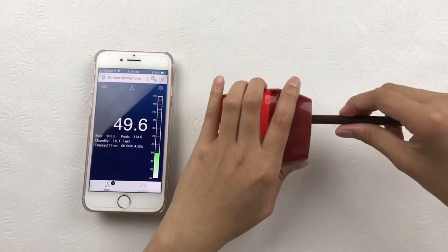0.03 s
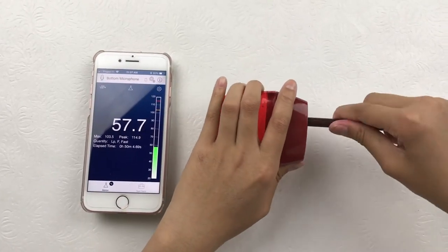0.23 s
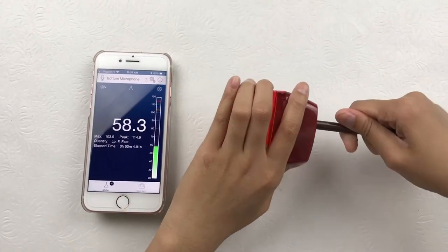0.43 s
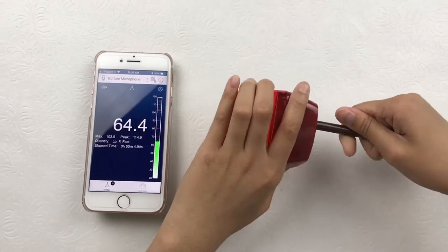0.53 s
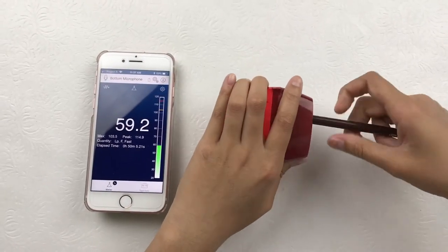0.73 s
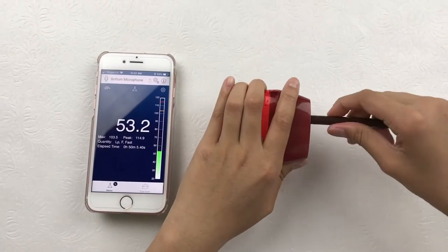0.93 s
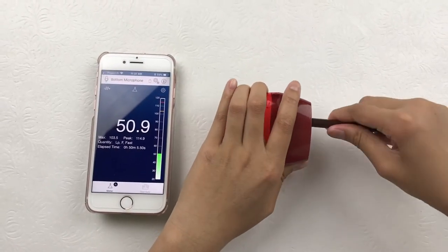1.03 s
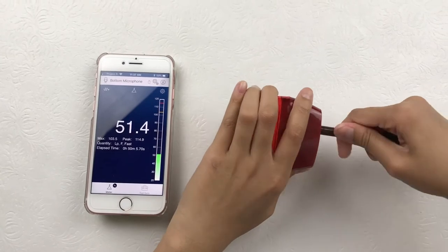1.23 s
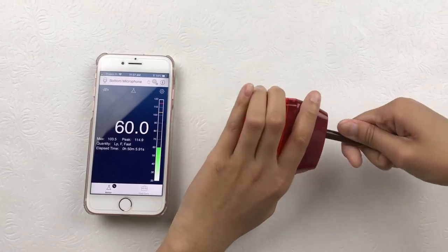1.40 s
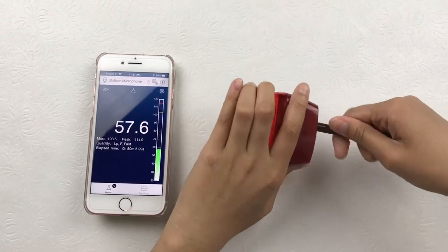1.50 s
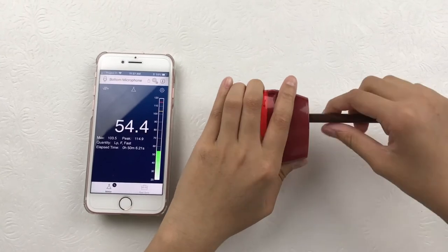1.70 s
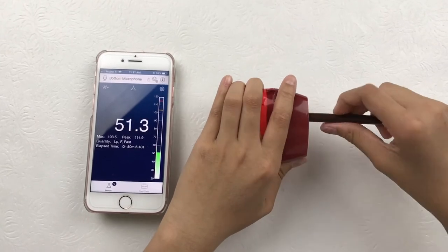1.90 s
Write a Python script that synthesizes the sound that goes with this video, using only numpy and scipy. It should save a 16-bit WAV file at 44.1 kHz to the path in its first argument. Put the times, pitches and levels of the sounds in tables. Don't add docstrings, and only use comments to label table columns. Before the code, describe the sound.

Close, dry pencil sharpening on a table: irregular stick-slip rasps peak in a hard double crack, pause for light finger rustles, resume more gently, then fade to small ticks over faint room hum.

```python
import sys
import numpy as np
from scipy import signal
from scipy.fft import rfft, irfft
from scipy.io import wavfile
from scipy.ndimage import uniform_filter1d

SR = 44100
rng = np.random.default_rng(int(sys.argv[2]) if len(sys.argv) > 2 else 0)


def attenuation_scalar(level_db):
    decades = np.asarray(level_db, float) / 20
    return 10 ** decades


def to_wav(sig):
    pcm = np.clip(np.atleast_2d(sig), -1, 1) * 32767
    pcm = np.round(pcm).astype(np.int16)
    wavfile.write(sys.argv[1], SR, pcm.T)


N = 85995

# [width/Hz, level/dB]
CUP_HZ = [1845, 2040, 1450, 1100]
CUP_MODES = [(105, 3), (170, -8), (250, -13), (400, -33.5)]
# [width/Hz, level/dB]
HOUSING_HZ = [2925, 3320, 3750, 4230, 4710, 5170, 5650, 6490]
HOUSING_MODES = [(108, -3), (156, 0), (237, -5), (193, -8.5), (150, -3.5), (238, 1), (278, -4), (216, -24)]
# [width/Hz, level/dB]
FIBRE_HZ = [7700, 8600, 9670, 12160, 14360]
FIBRE_MODES = [(970, -9.5), (1050, -21), (2630, -16), (1120, -9.5), (1500, -12)]
# [t/s, level/dB]
MUTING = [
    (.6, 2),
    (1.1, -3.5),
    (1.33, -5.5),
    (1.4, 1),
]


def sharpener(t):
    table_t60_s, table_db = 0.19, -13
    hollow_hz, hollow_width_hz = 2575, 360
    env, cracks = slips(t)
    noise = np.array([tearing() for _ in env])
    cup, housing, fibres = (env + scrape(t)) * noise + cracks
    mute_db = np.interp(t, *np.array(MUTING).T)
    direct = attenuation_scalar(15.0) * body(cup, CUP_HZ, CUP_MODES)
    direct += attenuation_scalar(6.0) * body(housing, HOUSING_HZ, HOUSING_MODES, mute_db)
    direct += attenuation_scalar(5.0) * body(fibres, FIBRE_HZ, FIBRE_MODES)
    direct = direct - 0.66 * ring(direct, hollow_hz, hollow_width_hz)
    direct = direct + knocks(t) + rings(t)
    tail_s = np.arange(SR // 4) / SR
    tail = rng.standard_normal(SR // 4) * attenuation_scalar(-60 * tail_s / table_t60_s)
    tail = tail / np.sqrt(np.sum(tail ** 2))
    return direct + attenuation_scalar(table_db) * signal.fftconvolve(direct, tail)[:N]


# [t/s, peak level/dB, cup ring level/dB, fibre crackle level/dB, fade/ms]
SNAPS = [(0.2045, -19.5, -19, -18, 2.65), (0.2603, -26.5, -11, -9, 3.4), (0.4446, -15.5, -9, -3, 1.25),
         (0.4806, -2.5, -19, -11, 2.8), (0.4892, -4.5, -15.5, -9.5, 2.13), (0.5065, -17.5, -8.5, -16, 3.6),
         (0.5219, -21, -4.5, -10, 2.4), (0.5593, -12, -10.5, -11, 2.65), (1.068, -39, -8, -16, 4.6),
         (1.2796, -28.5, -19, -7, 3.5), (1.3369, -29.5, -6.5, -14, 5.2), (1.3734, -31, -26, -6, 2),
         (1.3922, -36, -25, -15, 2.5), (1.4142, -19.5, -12, -17, 2.2), (1.4856, -39, -29, -12, 7.2),
         (1.5963, -58.5, 7, -18, 2.8)]
MORE_SNAP_S = [
    .2000,
    .5625,
    1.4285,
    1.346,
    .378,
    1.620,
    .5445,
    1.4350,
]
# [peak level/dB, cup ring level/dB, fibre crackle level/dB, fade/ms]
MORE_SNAP_SIZES = [(-32.5, -20, -9, 4.1), (-12, -37, -24, 2.7), (-22, -21, -11.5, 4.4), (-28, -17, -17, 5.3),
                   (-33, -6, -11, 2), (-57, -19, -18, 9.7), (-41, -3, -1, 3.5), (-13, -26, -13, 2.4)]
# [t/s, peak level/dB, cup ring level/dB, fibre crackle level/dB, swell/ms]
RASPS = [(0.2142, -26, -39, -17, 3.4), (0.2566, -25, -6.5, -12.5, 3), (0.309, -34, -16, -12, 1.6),
         (0.3384, -28.5, -26, -15, 5.1), (0.3842, -29, -3.5, -7, 2.5), (0.402, -43.5, 7.5, -18, 3.8),
         (0.411, -40, -6, -3, 1.5), (0.425, -28.5, -4.5, -5, 2.8), (0.5744, -29.5, -0.5, -20, 1.6),
         (0.592, -25.5, -9, -13, 2.9), (1.1252, -38, -17, -22, 3.5), (1.1383, -36.5, -10.5, -17, 4.9),
         (1.158, -34, -14.5, -13, 5.2), (1.179, -32, -10, -19, 1.5), (1.196, -33, -32, -14, 1.44),
         (1.2257, -20, -19.5, -14.5, 1.6), (1.254, -30, -24, -12, 5.4), (1.291, -27.5, -37, -13, 5),
         (1.303, -30.5, -26, -17, 6.6), (1.3187, -35, -26, -17.5, 3.9), (1.3565, -23.5, -17, -11, 1.7),
         (1.4235, -23.5, -28, -15, 3), (1.439, -21, -19, -23, 2.2)]
# [t/s, peak level/dB, cup ring level/dB, fibre crackle level/dB, swell/ms]
REGRIPS = [(0.685, -50, 0.5, -27, 1.7), (0.758, -39.5, -7, -25, 6.8), (0.775, -35, -10, -29, 2.6),
           (0.795, -47, -30, -23, 1.9), (0.945, -48, -17, -19, 1.9), (1.0293, -44.5, -12.5, -18, 4.3),
           (1.1, -48, -12, -11, 1.7), (1.643, -43.5, -8, -23, 3.8), (1.6861, -43, -22, -21, 5.3),
           (1.699, -33, -16, -30, 5.6), (1.7262, -32.5, -29, -35, 3.5), (1.7494, -44.5, -2, -26, 3.2),
           (1.7697, -38, -8, -29, 1.9), (1.7844, -45, -10, -13, 6.9), (1.8045, -35.5, -17, -44, 4.8),
           (1.826, -56, 5, -20, 4.3)]


def slips(t):
    slip_db, rise_ms, snap_db = -8, 0.62, 2
    rasp_db, cup_gain_db, crackle_gain_db = -6, 6.5, 13
    env, cracks = np.zeros((3, N)), np.zeros((3, N))
    snaps = SNAPS + [(at, *row) for at, row in zip(MORE_SNAP_S, MORE_SNAP_SIZES)]
    for k, (at, db, cup_db, crackle_db, span_ms) in enumerate(snaps + RASPS + REGRIPS):
        ms = np.clip((t - at) * 1000, 0, None)
        span_ms = max(span_ms, .3)
        share = attenuation_scalar(db) * np.array([[attenuation_scalar(cup_db + cup_gain_db)], [1], [attenuation_scalar(crackle_db + crackle_gain_db)]])
        if k < len(snaps):
            env += share * attenuation_scalar(slip_db) * (1 - np.exp(-ms / rise_ms)) * np.exp(-ms / span_ms)
            crack_at = int((at + rise_ms / 1000) * SR)
            cracks[:, crack_at] += share[:, 0] * attenuation_scalar(slip_db + snap_db)
        else:
            env += share * attenuation_scalar(rasp_db) * ms / span_ms * np.exp(-ms / span_ms)
    return env, cracks


# [t/s, scrape level/dB]
PRESSURE = [(.12, -75), (.16, -65), (.3, -58), (0.368, -69.5), (0.412, -49.5), (.47, -74), (0.582, -47.5),
            (0.642, -68.5), (.78, -70), (.83, -74.5), (1.05, -79), (1.16, -61.5), (1.22, -59.5),
            (1.3, -50.5), (1.439, -52.5), (1.532, -79.5), (1.721, -55), (1.86, -85)]


def scrape(t):
    chatter_db, chatter_per_s = 5.5, 140
    pressure_db = np.interp(t, *np.array(PRESSURE).T)
    return np.array([attenuation_scalar(pressure_db + chatter_db * walk(chatter_per_s) + share_db)
                     for share_db in (-3.5, 3, 3)])


def tearing():
    grain_db = 2.5
    return level(rng.standard_normal(N) * attenuation_scalar(grain_db * rng.exponential(size=N)), 0)


def body(x, hz, modes, mute_db=0):
    grip_db, grip_per_s, muted_below_hz = 4, 30, 4400
    out = 0
    for f, (width, db) in zip(hz, modes):
        gain_db = db + grip_db * walk(grip_per_s) + mute_db * (f < muted_below_hz)
        out = out + attenuation_scalar(gain_db) * ring(x, f, width)
    return out


def ring(x, hz, width):
    return signal.lfilter(*signal.iirpeak(hz, hz / width, fs=SR), x)


# [t/s, peak level/dB, f/Hz]
CUP_RINGS = [(0.2052, -25.5, 1844), (0.2262, -51, 1830), (0.2611, -28.5, 1850), (0.269, -54, 1940),
             (0.4114, -38, 1956), (0.4815, -23, 1876), (0.5222, -38, 1980), (0.5586, -28.5, 1980),
             (0.5624, -27.5, 1992), (0.5677, -37, 1890), (0.7788, -48, 1900), (1.1812, -44.5, 1920),
             (1.2786, -35, 1950), (1.2942, -39, 1840), (1.3057, -41, 1840), (1.3379, -52, 1830),
             (1.3922, -54, 1950), (1.4049, -50, 1980), (1.4138, -43, 1960), (1.4349, -27.5, 1822),
             (1.6434, -53.5, 1960), (1.704, -42, 1810), (1.7379, -46, 1780), (1.7492, -44, 1840),
             (1.7523, -47, 1860), (1.7651, -46, 1885), (1.7717, -46, 1833), (1.7865, -49, 1840)]
# [t/s, peak level/dB, f/Hz]
LOW_RINGS = [(0.2066, -35, 2980), (0.2627, -34, 2890), (0.41, -38, 3300), (0.4438, -30.5, 3330),
             (0.4807, -22.5, 3360), (0.4899, -24.5, 3230), (0.5219, -34, 3280), (0.561, -42, 3210),
             (0.7218, -56, 3360), (0.794, -51, 3390), (1.3579, -40, 3320), (1.3927, -49, 3310),
             (1.4141, -40, 3330), (1.4367, -34, 3420), (1.6506, -57, 3400), (1.699, -45.5, 3300),
             (1.8031, -42.5, 2835),
             (1.2805, -37, 4280),
    (1.4358, -38.5, 4500),
    (0.55, -49, 2500),
]
# [t/s, peak level/dB, f/Hz]
HIGH_RINGS = [(0.2049, -32, 5130), (0.2156, -43, 5300), (0.2253, -36, 5030), (0.2605, -32.5, 4950),
              (0.4801, -19, 5580), (0.4878, -14, 5760), (0.508, -23, 5210), (0.5223, -27, 5600),
              (0.558, -27, 5530), (0.5612, -19, 5660), (0.596, -31, 5810), (0.9487, -54, 5000),
              (1.071, -42.5, 4960), (1.1398, -41, 5170), (1.1817, -39, 5570), (1.1984, -43, 4880),
              (1.2276, -45, 5230), (1.279, -30, 5800), (1.3037, -32, 5600), (1.3224, -33, 5550),
              (1.3379, -32, 5700), (1.3555, -31, 5690), (1.414, -29, 5070), (1.4238, -29, 4780),
              (1.4326, -35, 5700), (1.709, -39, 4930), (1.805, -42.5, 5090)]
# [gain level/dB, rise/ms, fade/ms]
RING_SHAPES = [
    (5.5, 0.96, 3.15),
    (2, 1.2, 3.7),
    (1.5, 0.57, 1.65),
]
RING_LAG_MS = [
    .3,
    .5,
    1.,
]


def rings(t):
    out = np.zeros(N)
    parts = (CUP_RINGS, LOW_RINGS, HIGH_RINGS)
    for rows, (gain_db, rise_ms, fade_ms), lag_ms in zip(parts, RING_SHAPES, RING_LAG_MS):
        for at, db, hz in rows:
            ms = np.clip((t - at) * 1000 - lag_ms, 0, None)
            env = (1 - np.exp(-ms / rise_ms)) * np.exp(-ms / fade_ms)
            out += attenuation_scalar(db + gain_db) * env * np.sin(2 * np.pi * hz * ms / 1000)
    return out


KNOCK_S = [
    .2055,
    .2625,
    .4805,
    .4895,
    .5600,
    1.4360,
    1.7045,
]
# [f/Hz, level/dB]
KNOCKS = [(710, -38), (760, -58), (910, -33.5), (454, -32), (690, -37), (472, -31.5), (890, -43)]


def knocks(t):
    fade_ms = 2.12
    out = np.zeros(N)
    for at, (hz, db) in zip(KNOCK_S, KNOCKS):
        ms = np.clip((t - at) * 1000, 0, None)
        out += attenuation_scalar(db) * np.exp(-ms / fade_ms) * np.sin(2 * np.pi * hz * ms / 1000)
    return out


def squeak(t):
    at_s, hz, span_ms, db = .4765, 6050, 3, -42
    swell = np.exp(-((t - at_s) * 1000 / span_ms) ** 2)
    return attenuation_scalar(db) * swell * np.sin(2 * np.pi * hz * t)


def room(t):
    return ventilation(t) + fan(t) + hum(t)


# [f/Hz, level/dB per Hz]
AIR = [(41, -46), (70, 2), (113, -4), (351, -6), (472, -13.5), (1200, -27.5), (1310, -29), (1510, -29),
       (16000, -38.5)]
# [t/s, level/dB]
SWELL = [
    (.3, -1),
    (.55, 4),
    (.85, 0.5),
    (1.1, -2),
    (1.5, 1.5),
    (1.85, -2),
]


def ventilation(t):
    room_db, rumble_cut_hz = -55, 74
    gust_db, gust_per_s, gust_hz = 1, 9.5, 600
    hz, db = np.array(AIR).T
    f = np.arange(N // 2 + 1) * SR / N + 1
    colour = attenuation_scalar(np.interp(np.log(f), np.log(hz), db)) / (1 + (rumble_cut_hz / f) ** 6)
    air = irfft(rfft(rng.standard_normal(N)) * colour, N)
    low = signal.lfilter(*signal.butter(2, gust_hz, fs=SR), air)
    gust = attenuation_scalar(gust_db * walk(gust_per_s) + np.interp(t, *np.array(SWELL).T))
    return level(air + low * (gust - 1), room_db)


# [f/Hz, waver 0-1, level/dB]
FAN = [
    (173.4, 0.9, -64.5),
    (233.5, 1, -69),
    (344.4, 0.93, -61),
    (1182, 0.33, -76),
]


def fan(t):
    out = np.zeros(N)
    for hz, waver, db in FAN:
        tone = np.sin(2 * np.pi * hz * t + waver * walk(6.3))
        out += level((1 + waver * walk(9.45)) * tone, db)
    return out


# [t/s, f/Hz, level/dB]
HUM = [(0.0, 60, -66), (0.02, 61, -51), (0.064, 58.7, -56), (0.438, 58.9, -56.5), (0.488, 61, -60),
       (0.51, 58.44, -59), (1.112, 59.1, -53), (1.53, 58.23, -49), (1.95, 60.8, -52)]


def hum(t):
    at, hz, db = np.array(HUM).T
    phase = 2 * np.pi * np.cumsum(np.interp(t, at, hz)) / SR
    return np.sqrt(2) * attenuation_scalar(np.interp(t, at, db)) * np.sin(phase)


def walk(rate):
    steps = rng.standard_normal(size=400)
    return 0.78 * np.interp(np.arange(N) / SR * min(rate, 200), np.arange(len(steps)), steps)


def level(x, db):
    return x * attenuation_scalar(db) / np.sqrt(np.mean(x ** 2))


def scene():
    t = np.arange(N) / SR
    return (sharpener(t) + squeak(t) + room(t))[None]


def roll_off(x):
    return signal.sosfilt(signal.butter(12, 16630, fs=SR, output="sos"), x)


def record(dry):
    duck_top_db, duck_share, duck_ms = -34, 0.25, 10.6
    top_hz, top_leak_db, last_hz = 15750, -10, 16450
    loud = np.sqrt(uniform_filter1d(dry ** 2, int(duck_ms * SR / 1000), axis=1) + 1e-12)
    gain = np.minimum(attenuation_scalar(duck_top_db) / loud, 1) ** duck_share
    gain = uniform_filter1d(gain, int(duck_ms * SR / 2000), axis=1)
    cut = signal.sosfiltfilt(signal.ellip(12, .1, 40, top_hz, fs=SR, output="sos"), dry)
    leak = attenuation_scalar(top_leak_db) * np.minimum(loud / attenuation_scalar(-24), 1) ** 3
    mix = cut + leak * (dry - cut)
    mix = signal.sosfiltfilt(signal.cheby2(10, 30, last_hz + 250, fs=SR, output="sos"), mix)
    return roll_off(mix * gain)


dry = scene()
out = record(dry)
to_wav(out)
```